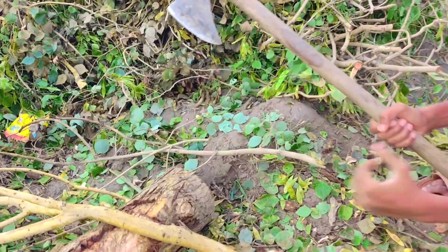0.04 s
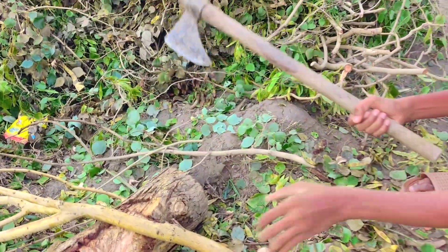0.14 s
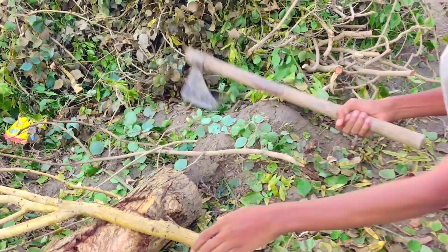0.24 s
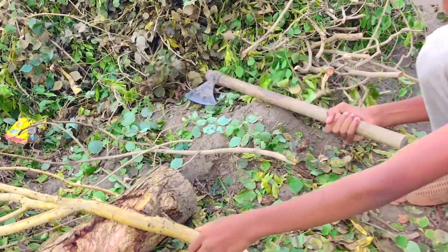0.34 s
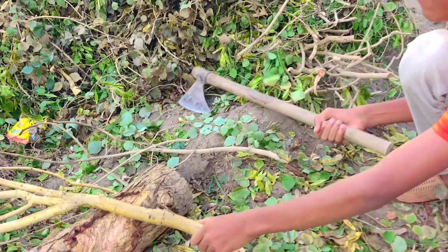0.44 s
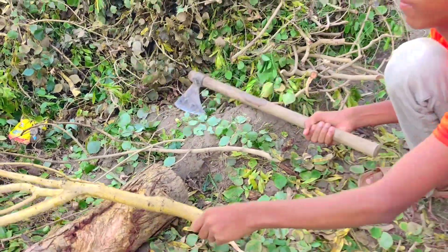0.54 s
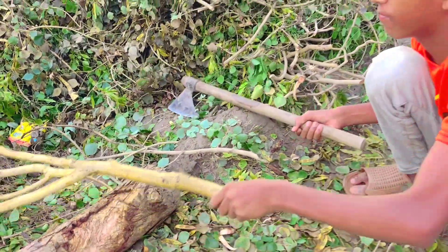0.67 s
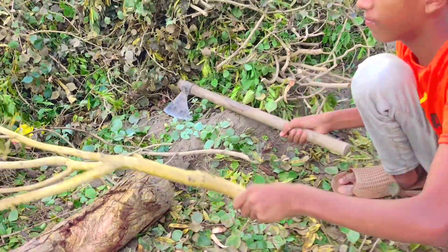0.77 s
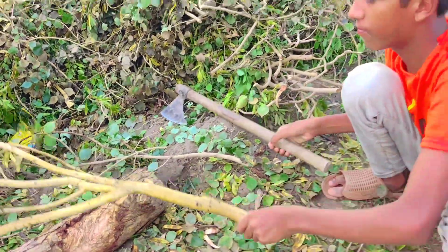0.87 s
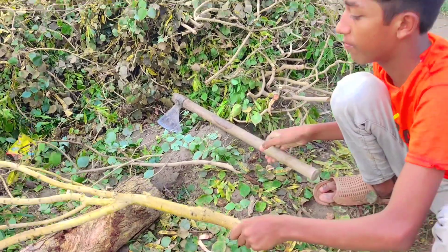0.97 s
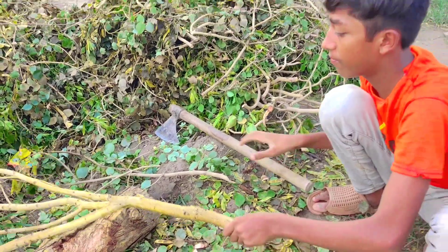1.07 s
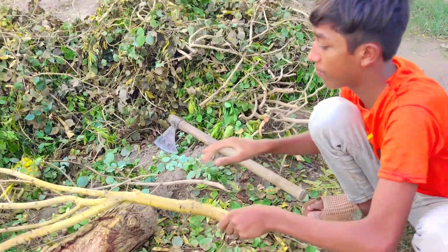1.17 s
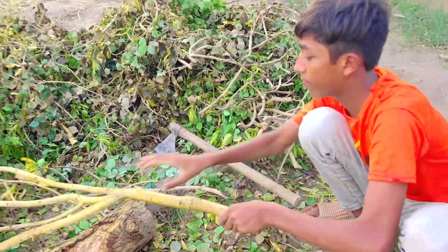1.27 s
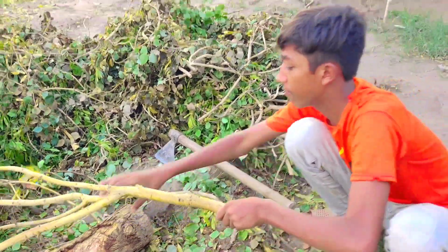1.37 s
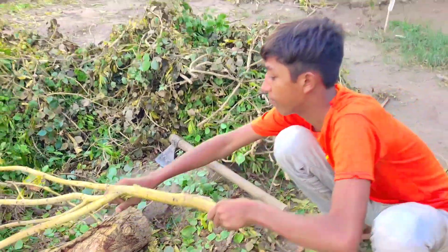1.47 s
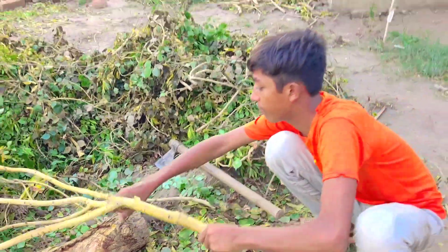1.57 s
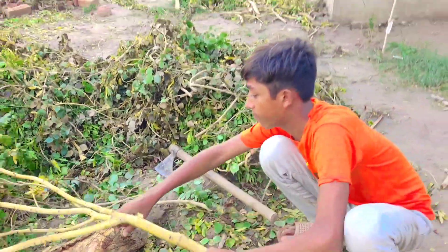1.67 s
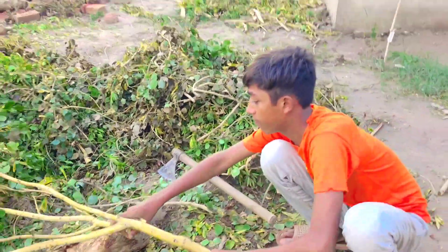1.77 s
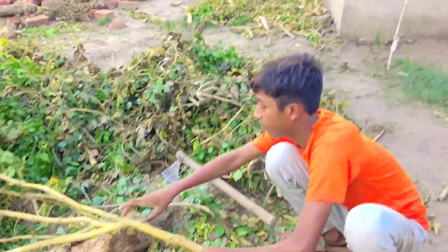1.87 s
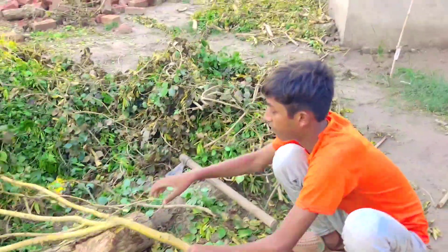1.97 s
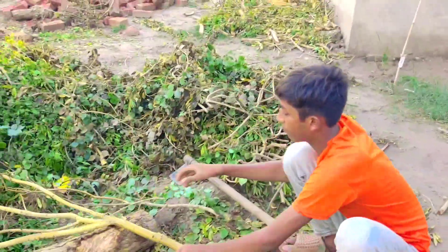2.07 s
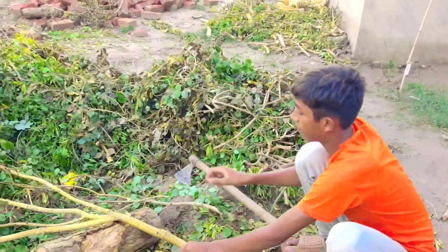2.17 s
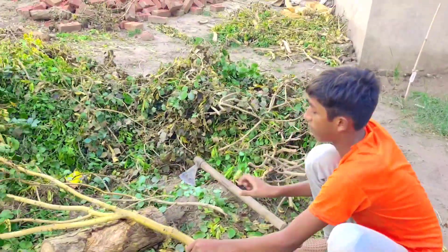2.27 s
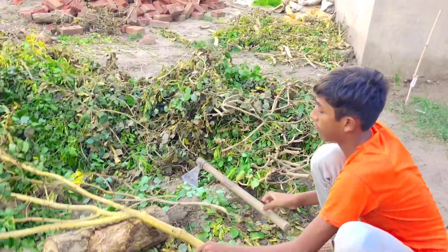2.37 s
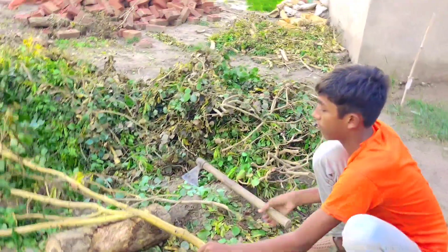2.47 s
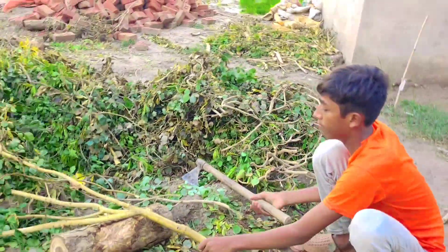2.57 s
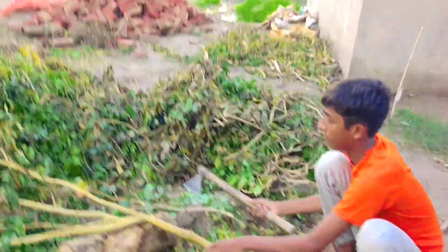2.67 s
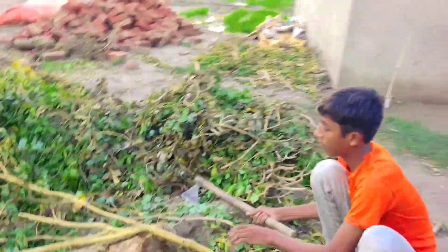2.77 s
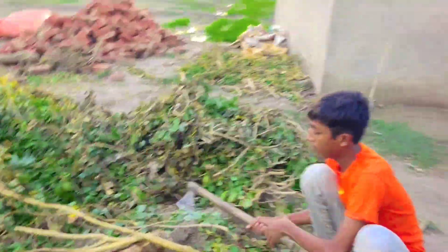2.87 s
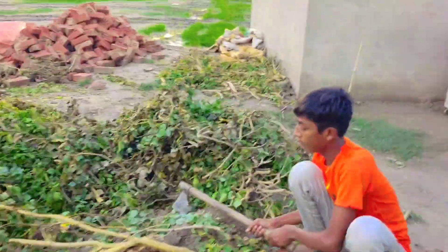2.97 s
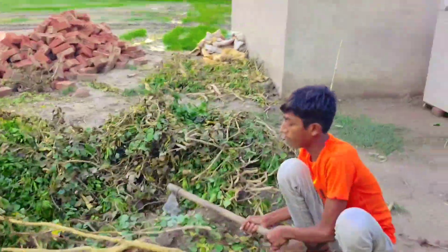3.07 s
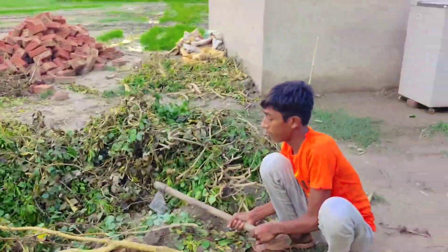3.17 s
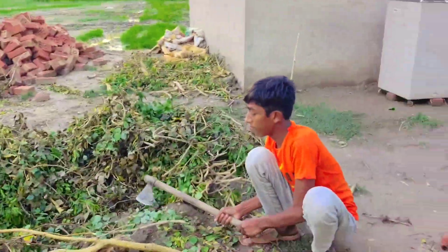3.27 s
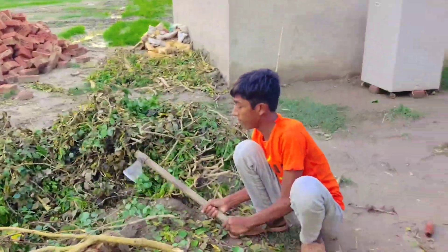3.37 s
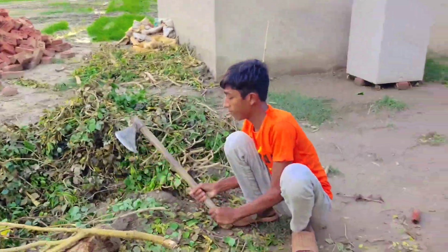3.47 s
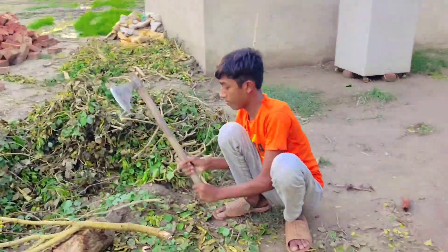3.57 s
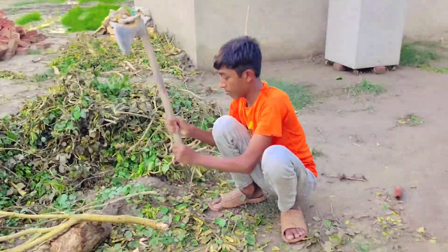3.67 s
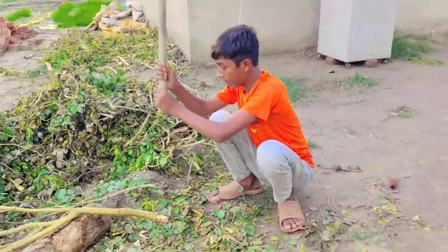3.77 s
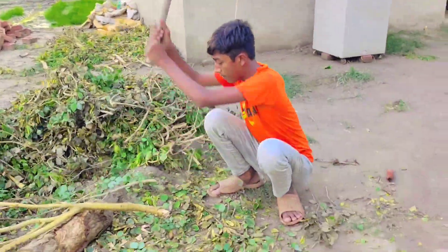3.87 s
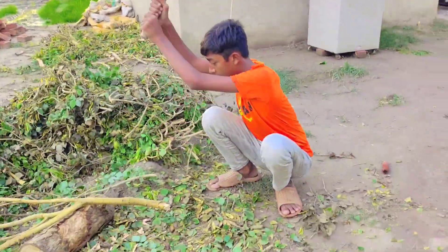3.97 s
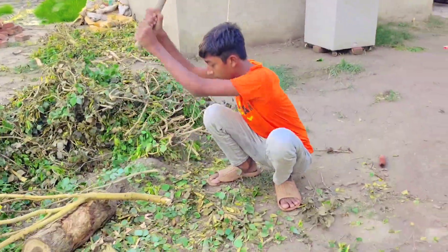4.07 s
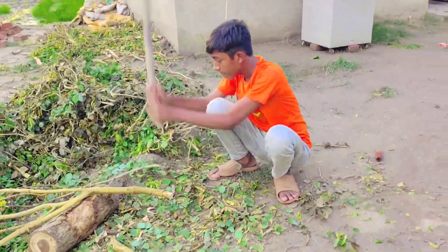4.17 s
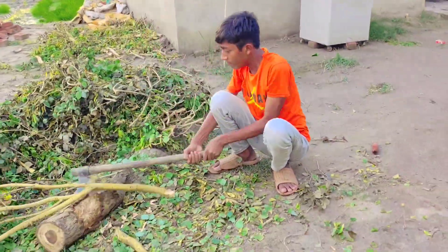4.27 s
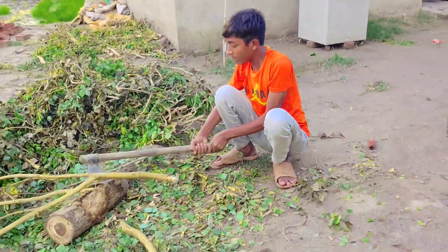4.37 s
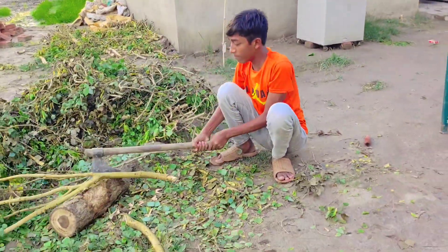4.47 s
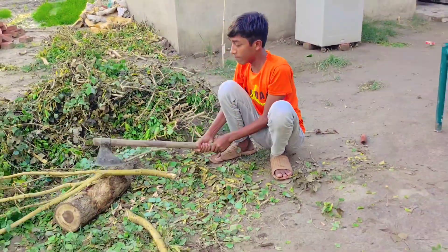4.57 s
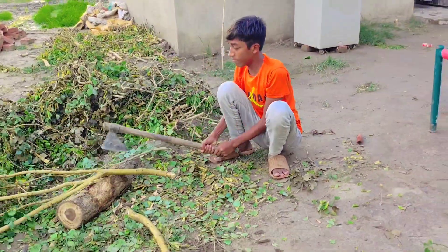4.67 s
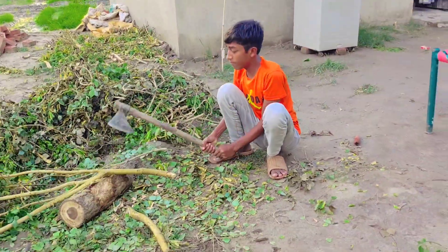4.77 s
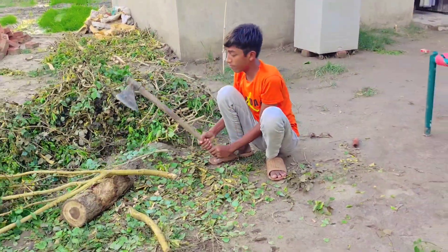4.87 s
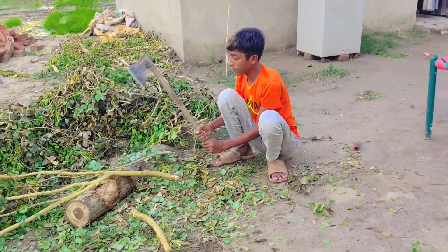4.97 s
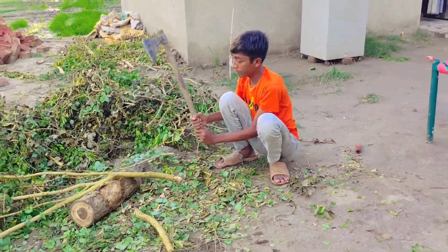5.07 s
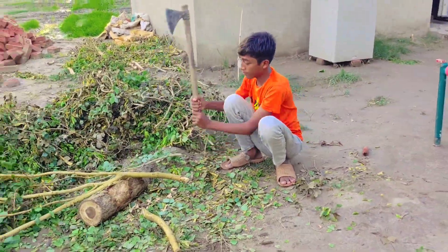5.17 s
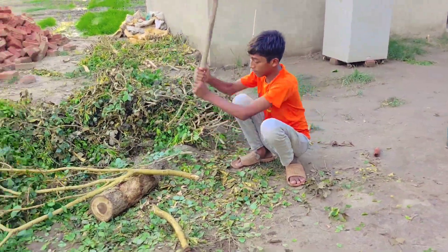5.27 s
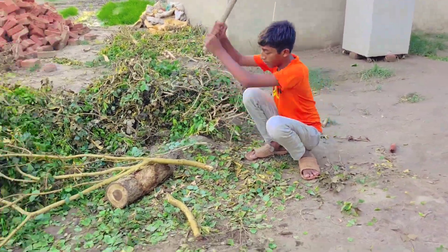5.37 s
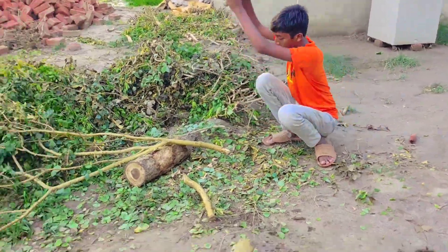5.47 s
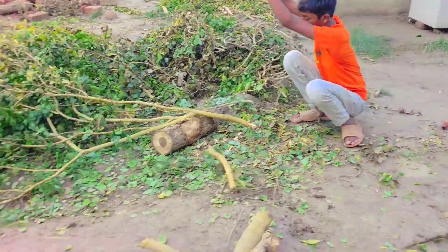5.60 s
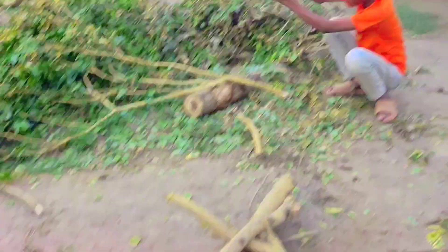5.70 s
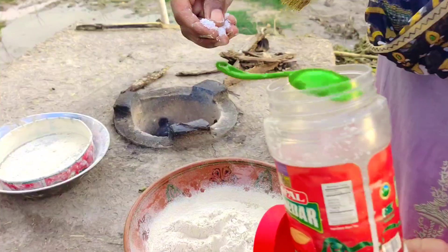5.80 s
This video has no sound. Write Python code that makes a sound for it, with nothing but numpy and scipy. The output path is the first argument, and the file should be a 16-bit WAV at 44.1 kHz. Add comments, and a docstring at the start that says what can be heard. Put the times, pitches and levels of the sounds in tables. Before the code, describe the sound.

Close outdoor stereo pickup in an open yard: a hatchet scrapes through stems and stops with a click, then a leafy branch rustles and drags with light woody knocks and dull bumps. A small bird whistles and chirrups during a calmer pause. One very loud, dry chop cracks the wood, leaves shiver briefly, and the bird continues over faint distant engines.

```python
"""Hatchet blow in a village yard

A hatchet scrapes to a stop, a leafy branch is dragged onto a log, and one hard blow chops into it.
Crackling noise makes the tearing fibres and leaves; decaying sines and narrow noise make the wood knocks.
A small bird sings in gliding tones nearby, two engines drone far off as wavering sines, and air rumbles."""
import sys
import numpy as np
from scipy import signal
from scipy.fft import rfft, irfft
from scipy.io import wavfile
from scipy.ndimage import uniform_filter1d, map_coordinates

SR = 44100
rng = np.random.default_rng(int(sys.argv[2]) if len(sys.argv) > 2 else 0)


def wrap_up_sound(samples):
    """Save the sound to the file named by the first command line argument, as 16-bit audio."""
    columns = np.atleast_2d(samples).T
    # keep every value between -1 and 1, then stretch to whole-number steps
    tamed = np.clip(columns, -1, 1)
    steps = np.round(tamed * 32767).astype(np.int16)
    wavfile.write(sys.argv[1], SR, steps)


N = 257544
T = np.arange(N) / SR
HZ = np.fft.rfftfreq(N, 1 / SR)


def amp(db):
    """Decibels to gain."""
    return 10 ** (np.asarray(db) / 20)


def evened(x):
    """Scales to rms 1."""
    return x / np.sqrt(np.mean(x ** 2) + 1e-20)


def read(points, hz):
    """Reads a table on a log-frequency axis."""
    f, value = np.transpose(points)
    return np.interp(np.log(hz + 1), np.log(f + 1), value)


def sides(db):
    """Left and right gains for a level difference; positive leans left."""
    return amp(np.array([[.5], [-.5]]) * db)


def add(mix, s, sound):
    """Mixes a stereo sound in at time s."""
    part = mix[:, max(round(s * SR), 0):][:, :sound.shape[-1]]
    part += sound[:, :part.shape[1]]


def peak(hz, centre_hz, half_width_hz):
    """Gain of one resonance, halved at half_width_hz from its centre."""
    return 1 / (1 + ((hz - centre_hz) / half_width_hz) ** 2)


def burst(t, rise, decay):
    """Envelope that swells quickly and dies away."""
    return (1 - np.exp(-t / rise)) * np.exp(-t / decay)


# likeness of left and right for sound from all round: (frequency [Hz], coherence [-1 to 1])
ALL_ROUND_LIKENESS = [(30, 0.55), (65, 0.89), (130, 0.99), (300, 0.83), (640, 0.73), (1400, -0.15),
                      (3000, -0.048), (7000, -0.14), (15000, 0.56)]


def noise(gain, size=N, grain_db=0, likeness=ALL_ROUND_LIKENESS):
    """Stereo noise of a given spectrum at rms 1; grain_db roughens it with random spikes."""
    grain = amp(grain_db * np.minimum(rng.exponential(1, size), 6))
    white = rng.standard_normal((2, size)) * grain
    a, b = rfft(white)
    same = np.clip(read(likeness, np.fft.rfftfreq(size, 1 / SR)), -1, 1)
    pair = np.array([a, same * a + np.sqrt(1 - same ** 2) * b])
    return evened(irfft(pair * gain, size))


def wander(rate_hz):
    """Slow random drift of rms 1, with little movement faster than rate_hz."""
    size, step_s = 16384, 16 / SR
    lowpass = np.exp(-(np.fft.rfftfreq(size, step_s) / rate_hz) ** 2)
    slow = irfft(rfft(rng.standard_normal(size)) * lowpass)
    return evened(np.interp(T, np.arange(size) * step_s, slow))


SWELL_ROUND = 0.34  # how blunt the top of a swell is


def swells(rows):
    """Gain over time of movements that each rise to a blunt top and settle; their powers add."""
    power = np.zeros(N)
    for s, db, rise, fall in rows:
        away = np.where(T < s, (s - T) / rise, (T - s) / fall)
        drop = np.minimum(np.hypot(away, SWELL_ROUND) - SWELL_ROUND, 20)
        power += amp(2 * db) * np.exp(-2 * drop)
    return np.sqrt(power)


def crackle(count, low_hz, high_hz, decay_s, spread_db):
    """Tiny snaps scattered at random, each with its own pitch, force and side; rms 1."""
    when, pitch, force, side = rng.random((count, 4)).T
    steps = np.arange(300)
    t, hz = steps / SR, low_hz * (high_hz / low_hz) ** pitch[:, None]
    snaps = np.sin(2 * np.pi * hz * t) * burst(t, .0001, decay_s)
    force_db = spread_db * np.minimum(-np.log(1 - force), 4)
    gains = amp(force_db) * sides(24 * (side - .5))
    at = (when * (N - len(steps))).astype(int)[:, None] + steps
    channels = [np.bincount(at.ravel(), (snaps * gain[:, None]).ravel(), N) for gain in gains]
    return evened(np.array(channels))


# colour of the tearing fibres: (frequency [Hz], relative level [dB per Hz])
TEAR_COLOUR = [(100, -7.5), (280, -2.5), (410, -17), (600, 1), (900, -9), (1250, -3.5), (1490, -11.5),
               (2100, -2), (2950, 0.5), (3700, -6.5), (5500, -10.5), (7700, -10.5), (8600, -15.5),
               (10500, -10.5), (13000, -13), (15500, -15)]
# narrow resonances of blade and haft, and one hollow: (frequency [Hz], width [Hz], boost [dB])
HATCHET_MODES = [(1610, 130, 1.5), (1823, 85, 3), (2050, 60, 5.5), (2270, 65, 5), (2450, 60, -11.5),
                 (2570, 80, 4), (2862, 80, 2.5), (2980, 50, 3), (3370, 120, 9.5), (3960, 49, 6),
                 (4256, 68, 5.5), (4820, 60, 2.5), (5430, 110, 6.5), (5610, 50, 3.5), (6800, 180, 2)]
# modes of branch and log, before the bass cut: (frequency [Hz], level [dB], t60 [s])
LOG_MODES = [(68, -19, 0.098), (120, -12, 0.06), (260, -12, 0.076), (291.7, -21, 0.063), (505, -32, 0.03),
             (601, -12, 0.034), (687, -26.5, .035), (1100, -25.5, 0.04), (1216, -8, 0.04), (1170, -30, .06),
             (1370, -27, 0.03)]
# the branch is grazed, driven onto the log, and its ring returns softly from the wall:
# (time [s], level [dB], contact time [s])
LOG_CONTACTS = [(4.4129, -16.5, .0007), (4.4154, -20, .0008), (4.4291, -11, 0.00077),
                (4.4346, 1.5, 0.00036), (4.4432, -17, 0.0024), (4.4493, -6, 0.0056), (4.4734, -25.5, .0004)]
# direction of the blow: (frequency [Hz], left-right difference [dB])
BLOW_LEAN = [(60, 2.5), (110, 2.5), (200, 2.5), (380, 1), (700, 2.5), (1290, 5.5), (2380, -2.5), (4400, -2),
             (8120, 5), (15000, -1)]
# likeness of left and right for the blow, which comes from one spot: (frequency [Hz], coherence)
BLOW_LIKENESS = [(100, 0.93), (700, 0.92), (3200, 0.6), (4500, 0.28), (15000, .18)]


def chop():
    """Fibres tear in a dense crackle, coloured by the hatchet; branch and log ring with it."""
    hatchet_db = sum(db * peak(HZ, hz, width / 2) for hz, width, db in HATCHET_MODES)
    colour = amp(read(TEAR_COLOUR, HZ) + hatchet_db)
    tear = noise(colour, grain_db=3.5, likeness=BLOW_LIKENESS) * bite()
    t = np.arange(SR // 2) / SR
    ring = sum(amp(db - 60 * t / t60) * np.sin(2 * np.pi * hz * t) for hz, db, t60 in LOG_MODES)
    ring = signal.lfilter(*signal.butter(3, 50, "high", fs=SR), ring)  # cuts the deep bass below 50 Hz from the ring
    wood = np.zeros((2, N))
    for s, db, contact in LOG_CONTACTS:
        push = np.exp(-((t[:600] - contact / 2) / (contact / 2)) ** 2)  # a longer contact is duller
        add(wood, s, amp(db) * np.convolve(ring, push / push.sum()) * sides(0))
    blow = tear + wood + splinters()
    left, right = irfft(rfft(blow) * sides(read(BLOW_LEAN, HZ)), N)
    return np.array([left, np.roll(right, 7)])  # the right microphone hears it 7 samples later


# what dies away after the crack (split, tearing fibres, scattering chips): (level [dB], decay [s])
CRACK_STAGES = [(2.5, 0.0031), (-16.5, 0.018), (-41.5, 0.04)]
CHOP_S, BRUSH_S, BRUSH_DB = 4.4286, 0.022, -21  # the blade brushes the bark, then the wood cracks
CRACK_RISE_S = 0.0025


def bite():
    """Force of the blade: a growing brush through the bark, then a sudden crack that dies in stages."""
    after = np.maximum(T - CHOP_S, 0)
    growth = np.clip(1 + (T - CHOP_S) / BRUSH_S, 0, 1)
    brush = amp(BRUSH_DB) * growth * np.exp(-after / CRACK_RISE_S)
    return brush + sum(amp(db) * burst(after, CRACK_RISE_S, decay) for db, decay in CRACK_STAGES)


# splinters that break away as the blade sinks in: (time [s], level [dB], frequency [Hz], decay [s])
SPLINTER_HITS = [(4.4355, -21, 7900, 0.0034), (4.4383, -20, 1800, .003), (4.4477, -21, 2550, .004),
                 (4.4493, -26, 2830, 0.0093), (4.4545, -26, 2050, .003), (4.46, -24, 1750, 0.0012)]
SPLINTER_HALF_WIDTH_HZ = 150
# the bright snap at the height of the crack
SNAP_S, SNAP_DB, SNAP_DECAY_S, SNAP_HZ = 4.4312, -10.5, 0.0016, 11000


def splinters():
    """One bright snap as the branch gives way, and splinters, each a noise burst with its own pitch."""
    out, size = np.zeros((2, N)), 4096
    t, hz = np.arange(size) / SR, np.fft.rfftfreq(size, 1 / SR)
    snap = noise(peak(hz, SNAP_HZ, 6000), size, likeness=BLOW_LIKENESS)
    add(out, SNAP_S, amp(SNAP_DB) * snap * burst(t, .0004, SNAP_DECAY_S))
    for s, db, ring_hz, decay in SPLINTER_HITS:
        crack = noise(peak(hz, ring_hz, SPLINTER_HALF_WIDTH_HZ), size, likeness=BLOW_LIKENESS)
        add(out, s, amp(db) * crack * burst(t, .0004, decay))
    return out


# resonances of the sliding blade: (frequency [Hz], width [Hz], relative level [dB])
BLADE_MODES = [(1090, 260, -9.5), (1820, 110, -4), (2660, 160, -3), (3150, 440, -1), (3870, 140, 1.5),
               (5630, 370, -1), (6360, 380, -2), (7900, 1400, -21), (9150, 270, -9), (12000, 3500, -11)]
# bright colour shared by click, knocks and rustle, with the microphone's own resonances:
# (frequency [Hz], relative level [dB per Hz])
BRIGHT_COLOUR = [(410, -46), (700, -14.5), (968, -16), (1150, -14.5), (1250, -25), (3030, -1.5), (3730, -8),
                 (4080, -4.5), (4580, -7.5), (5940, -1.5), (7000, -7.5), (7650, -4), (8800, -12.5),
                 (11600, -6), (13600, -10), (14800, -6), (15500, -13)]
# the blade brushes through stems, grips the soil, and stops with a click
GRIP_S, STOP_S, SLIDE_DB, CLICK_DB, CLICK_DECAY_S = 0.39, 0.4163, -36, -12.5, 0.0015
STEMS_DB, APPROACH_DB_PER_S, RELEASE_DB_PER_S = -9, 199, 260
SLIDE_SAG_PER_S, SLIP_DB, SLIPS_HZ = .5, 1.5, 140


def slide():
    """The blade nears through stems, scrapes in jerks that sink in pitch as it slows, and clicks to a stop."""
    before, after = np.maximum(GRIP_S - T, 0), np.maximum(T - STOP_S, 0)
    db = SLIDE_DB + STEMS_DB * (before > 0) - APPROACH_DB_PER_S * before - RELEASE_DB_PER_S * after
    modes = sum(amp(mode_db) * peak(HZ, hz, width / 2) for hz, width, mode_db in BLADE_MODES)
    scrape = noise(modes, grain_db=1.5)
    speed = 1 - SLIDE_SAG_PER_S * np.clip(T - GRIP_S, -.1, .1)
    # reading the noise at the blade's speed bends its pitch
    scrape = np.array([map_coordinates(side, [np.cumsum(speed)], order=3) for side in scrape])
    jerks = amp(db + SLIP_DB * wander(SLIPS_HZ)) * scrape
    click = noise(amp(read(BRIGHT_COLOUR, HZ))) * burst(after, 0.0011, CLICK_DECAY_S)
    return jerks + amp(CLICK_DB) * click * sides(2.7)


# light knocks of wood, and near 2.98 s clean overtones of a rubbing squeak, before a common gain: # (time [s],
# ring level [dB], ring frequency [Hz], cleanness [0-1], crunch level [dB], decay [s], # left-right difference
# [dB])
WOOD_KNOCKS = [(0.228, -64, 750, .3, -52.5, .004, -2), (0.369, -48, 2390, .5, -45, 0.0065, 0),
               (0.391, -43, 2700, 0.8, -44, 0.007, 2), (0.411, -43, 1824, 0.94, -43, 0.013, 4),
               (0.4148, -29, 3190, 1, -37, 0.0045, 3), (0.416, -43, 1058, 0.63, -38, 0.012, 1),
               (0.425, -36, 5640, .6, -28.5, 0.0034, 2), (0.437, -40, 2650, .3, -50, 0.0095, 1),
               (0.452, -41, 1560, 0.6, -44, 0.0071, 8), (0.451, -39.5, 2800, 0.2, -46, 0.012, -3),
               (0.481, -39.5, 660, 0.6, -46, 0.0098, -1), (1.696, -43.5, 1610, .1, -50, 0.003, 2),
               (1.697, -48, 1150, .1, -60, 0.003, 2), (1.731, -52, 6300, .4, -43.5, 0.0036, -1),
               (1.917, -53, 750, 0.1, -53, 0.007, 1), (1.991, -48.5, 2660, 0.47, -56, 0.0062, -5),
               (2.032, -51, 2830, 0.7, -57, .008, 0), (2.128, -49, 3040, .5, -48, .005, -3),
               (2.178, -47, 2840, .6, -54, .004, -2), (2.246, -49, 1364, 0.57, -47, 0.005, -1),
               (2.262, -48, 2900, .4, -52, .006, 0), (2.331, -50, 2200, .4, -52, .003, -2),
               (2.352, -49, 3020, 0.42, -45, 0.0041, -4), (2.384, -44.5, 3650, 0.2, -47.5, 0.033, -3),
               (2.403, -41.5, 3010, 0.5, -35.5, 0.016, -4.5), (2.421, -42, 2490, 0.6, -55, 0.0071, -1),
               (2.482, -53, 724, 0.69, -48, 0.0056, -4), (2.536, -55, 1546, 0.62, -62, 0.012, 0),
               (2.626, -50.5, 4760, .8, -62, .014, -5), (2.649, -47, 2610, 0.6, -58, .006, -9),
               (2.755, -49, 704, 0.3, -54, 0.0042, -2), (2.847, -46.5, 2310, 0.84, -60, 0.011, 1),
               (2.885, -54, 2810, 0.76, -61, .015, -8), (2.912, -54, 3450, .7, -60, .01, -8),
               (2.929, -51.5, 1480, 0.27, -59, .007, 0), (2.947, -58, 3900, .5, -62, .009, -3),
               (2.978, -43, 3070, 0.9, -54, 0.013, -8), (2.984, -40, 1846, 0.2, -46, 0.012, -1),
               (2.987, -43.5, 3940, 0.9, -57, 0.01, -6), (2.988, -44.5, 4720, 0.7, -58, 0.0085, -8),
               (2.987, -37.5, 950, 0.1, -58, 0.0082, 6), (3.043, -53, 1440, .6, -58, .004, 0),
               (3.671, -49, 2298, .1, -67, 0.024, 1), (4.197, -52, 1980, .1, -59, 0.003, 3)]
KNOCK_LAG_S = .00008  # the clean tone reaches the right microphone this much later


def knocks():
    """Sticks knock: a crunch of bark and one ring, anything from a dry clack to a clean note."""
    out, size = np.zeros((2, N)), 8192
    t, hz = np.arange(size) / SR, np.fft.rfftfreq(size, 1 / SR)
    crunch = amp(read(BRIGHT_COLOUR, hz))
    for s, ring_db, ring_hz, clean, crunch_db, decay, pan_db in WOOD_KNOCKS:
        tone = np.sqrt(2) * np.sin(2 * np.pi * ring_hz * (t - np.array([[0], [KNOCK_LAG_S]])))
        clack = noise(peak(hz, ring_hz, 130 + 0.14 * ring_hz), size)
        ring = clean * tone + np.sqrt(1 - clean ** 2) * clack
        sound = amp(ring_db) * ring + amp(crunch_db) * noise(crunch, size, grain_db=1.5)
        add(out, s - .001, 1.58 * sound * burst(t, 0.0015, decay) * sides(pan_db))
    return out


# stems and wood squeaking briefly as they rub: (time [s], length [s], level [dB],
# start frequency [Hz], end frequency [Hz], overtones [dB])
RUB_SQUEAKS = [(0.307, 0.03, -62.5, 3120, 2950, -20), (0.322, 0.034, -59, 3870, 3690, -30),
               (0.34, 0.026, -60, 2770, 2800, 10), (0.348, 0.027, -54, 3100, 3180, -5),
               (0.363, 0.026, -44, 3530, 3520, -30), (0.37, 0.026, -43.5, 3120, 3140, 21),
               (2.968, 0.013, -48, 1150, 1070, -12), (2.979, 0.016, -38.5, 1058, 987, -14)]


def squeaks():
    """Stick and slip: a short, unsteady tone with two overtones."""
    out = np.zeros((2, N))
    for s, length, db, start_hz, end_hz, overtones_db in RUB_SQUEAKS:
        size = int(length * SR)
        jitter = evened(uniform_filter1d(rng.standard_normal(SR // 4), 40))[:size]
        hz = np.linspace(start_hz, end_hz, size) * (1 + 0.0079 * jitter)
        phase = 2 * np.pi * np.cumsum(hz) / SR
        overtones = np.sin(2 * phase) + 0.37 * np.sin(3 * phase)
        tone = np.sin(phase) + amp(overtones_db) * overtones
        add(out, s, amp(db) * evened(tone * signal.windows.tukey(size, .6)) * sides(0))
    return out


# movements that stir the leaves: (time of height [s], level [dB], rise [s], fall [s])
LEAF_STIRS = [(0.09, -67.5, 0.14, 0.21), (0.44, -47.5, .02, 0.058), (0.617, -55.5, 0.028, 0.029),
              (0.865, -39.5, 0.078, 0.21), (1.189, -48, 0.023, 0.028), (1.35, -57.5, 0.03, 0.13),
              (1.735, -53.5, 0.045, 0.17), (1.92, -52.5, 0.029, 0.012), (2.11, -47, 0.097, 0.2),
              (2.24, -49, 0.029, 0.044), (2.51, -53.5, 0.038, 0.087), (2.645, -54, 0.055, 0.086),
              (2.93, -61, 0.14, 0.38), (3.545, -63.5, 0.057, 0.039), (3.7, -63, 0.048, 0.025),
              (3.96, -67, 0.13, 0.13), (4.38, -67.5, 0.14, 0.055), (4.48, -40.5, 0.0089, 0.061),
              (4.63, -53.5, 0.043, 0.082), (5.1, -70.5, .015, 0.042), (5.385, -58.5, .02, 0.019),
              (5.52, -74, .03, .05)]
STIR_REST_DB = -92  # leaves at rest


def stirring():
    """How strongly the branch moves: swells over a faint rest level."""
    return swells(LEAF_STIRS) + amp(STIR_REST_DB)


def rustle(stir):
    """Countless leaf contacts as the branch moves, with coarser snaps of stalks among them."""
    wash = noise(amp(read(BRIGHT_COLOUR, HZ)), grain_db=1.7) * amp(wander(43))
    stalks = crackle(count=7000, low_hz=2500, high_hz=7800, decay_s=.0015, spread_db=2.0)
    return (amp(1.9) * wash + amp(-6.5) * stalks) * stir * sides(-1.3)


def twigs(stir):
    """Small twigs snap at random, louder while the branch moves; each has its own pitch and side."""
    out, t = np.zeros((2, N)), np.arange(900) / SR
    for when, pitch, force, side in rng.random((150, 4)):
        at = int(when * N)
        tick = np.sin(2 * np.pi * 1900 * 5 ** pitch * t) * burst(t, .0002, 0.001)
        add(out, T[at], stir[at] * amp(-5.5 + 13 * force ** 2) * tick * sides(12 * (side - .5)))
    return out


# ticks of dry leaves and grit: (time [s], level [dB], left-right difference [dB])
LEAF_TICKS = [(0.018, -37, -3.5), (0.086, -52.5, -6), (1.413, -52, -2.5), (2.351, -40.5, -6),
              (2.994, -46, -9), (3.035, -45, -7), (3.066, -47, -7), (3.101, -50, 2), (3.341, -48, -9)]
# brief ringing of the ticks: (frequency [Hz], width [Hz], relative level [dB])
TICK_MODES = [(7400, 7500, -21.5), (8630, 460, -15.5), (12640, 410, 1.5), (14000, 540, -1)]
TICK_DECAY_S = 0.012


def ticks():
    """Dry leaves and grit tick: short noise bursts through high resonances."""
    out, size = np.zeros((2, N)), 16384
    t, hz = np.arange(size) / SR, np.fft.rfftfreq(size, 1 / SR)
    modes = sum(amp(mode_db) * peak(hz, mode_hz, width / 2) for mode_hz, width, mode_db in TICK_MODES)
    for s, db, pan_db in LEAF_TICKS:
        add(out, s - .001, amp(db) * noise(modes, size) * burst(t, 0.0018, TICK_DECAY_S) * sides(pan_db))
    return out


# dull low bumps, before a common gain: (time [s], level [dB], frequency [Hz], left-right difference [dB])
LOW_BUMPS = [(0.403, -38.5, 122, 1), (1.991, -37.5, 133, 11.5), (2.213, -36.5, 77, 9),
             (2.394, -37, 149, -1), (2.815, -31, 62.5, -7), (2.878, -26.5, 77, -4.5),
             (2.976, -30.5, 77, -11), (3.519, -37.5, 81.5, 14.5), (3.591, -37, 131, 9.5),
             (4.60, -38.5, 66, 6.5)]
# likeness of left and right for the bumps: (frequency [Hz], coherence)
BUMP_LIKENESS = [(40, 0.12), (90, 0.16), (160, 0.92), (400, 0.86)]
BUMP_DECAY_S = 0.037


def bumps():
    """Dull low bumps, wind buffets or handling of the microphones: soft bursts of low, narrow noise."""
    out, size = np.zeros((2, N)), 16384
    t, hz = np.arange(size) / SR, np.fft.rfftfreq(size, 1 / SR)
    for s, db, bump_hz, pan_db in LOW_BUMPS:
        bump = noise(peak(hz, bump_hz, 0.34 * bump_hz), size, likeness=BUMP_LIKENESS)
        add(out, s, 1.44 * amp(db) * bump * burst(t, 0.0068, BUMP_DECAY_S) * sides(pan_db))
    return out


# feet and branch scuffing over earth: (time of height [s], level [dB], rise [s], fall [s])
EARTH_SCUFFS = [(0.416, -43.5, 0.014, 0.014), (0.92, -55.5, 0.11, 0.085), (1.75, -61.5, 0.12, 0.21),
                (2.12, -56.5, 0.066, 0.065), (2.245, -49.5, 0.043, 0.053), (2.41, -45.5, 0.023, 0.03),
                (2.55, -50.5, 0.042, 0.066), (2.93, -50.5, 0.044, 0.054), (3.05, -56, 0.027, 0.028)]
# colour of the scuffing: (frequency [Hz], relative level [dB per Hz])
EARTH_COLOUR = [(200, 4), (550, -3), (1300, -5.5), (2200, -7), (5000, -8), (15000, -38)]


def scuffing():
    """Feet and branch rub the earth: uneven dull noise with gritty snaps."""
    earth = noise(amp(read(EARTH_COLOUR, HZ)), grain_db=3.0) * amp(2.65 * wander(59))
    grit = crackle(count=3500, low_hz=2200, high_hz=4000, decay_s=.0018, spread_db=2.0)
    return (amp(-.5) * earth + amp(-6.5) * grit) * swells(EARTH_SCUFFS)


BEAT_UNEVEN = .1  # pulses come unevenly by this share


def note(length, db, pitches, swing_hz=0, rate=0, pulsing=0, swell_db=0):
    """One bird note gliding through the given pitches; in pulsed notes each pulse is a small downward sweep."""
    t = np.arange(int(length * SR)) / SR
    jitter, drift, force = (evened(uniform_filter1d(rng.standard_normal(SR // 2), size))[:len(t)]
                            for size in (40, 500, 400))
    u = t / length
    beat = 2 * np.pi * np.cumsum(rate * (1 + BEAT_UNEVEN * drift)) / SR
    glide = np.polyfit(np.linspace(0, 1, len(pitches)), pitches, len(pitches) - 1)
    hz = np.polyval(glide, u) + swing_hz * np.sin(beat) + (18 + 70 * pulsing) * jitter
    phase = 2 * np.pi * np.cumsum(hz) / SR
    pulses = 1 - pulsing * np.cos(beat)
    swell = signal.windows.tukey(len(t), .35) * pulses * amp(swell_db * u + 2 * pulsing * force)
    return amp(db) * evened(swell * (np.sin(phase) + amp(-32) * np.sin(2 * phase)))


# arched whistles, each ending in a quick downward flick: (time [s], length [s], level [dB],
# top frequency [Hz], flick relative to whistle [dB], left-right difference [dB])
BIRD_WHISTLES = [(3.16, 0.061, -52.5, 3500, -20, -9), (3.788, 0.062, -56, 3530, -3.5, 7),
                 (4.631, 0.066, -51.5, 3490, -4, -4), (5.079, 0.07, -47.5, 3522, -7, -4.5)]
# pitch from start to end, as shares of the top
WHISTLE_SHAPE, FLICK_SHAPE = np.array((0.97, 0.98, 0.99, 1.0, 0.98)), np.array((0.96, 0.95, 0.935))
FLICK_S, FLICK_GAP_S, WHISTLE_SWELL_DB = .014, .004, 2.5  # each whistle grows from start to end
# chirrups, a pip and a fast buzz: (time [s], pip level [dB], frequency [Hz], left-right difference [dB])
BIRD_CHIRRUPS = [(3.436, -48, 3717, 6), (4.264, -51.5, 3536, -3)]
PIP_S, PIP_SHAPE, NOTE_GAP_S = 0.022, np.array((1, 0.98, 0.99, 0.97, 0.93)), 0.003
BUZZ_SHAPE = np.array((.86, 1, .97))  # the buzz arches
BUZZ_S, BUZZ_DB, BUZZ_SWING_HZ, BUZZ_PER_S = 0.028, -4, 330, 170  # level is relative to the pip
# long calls, a pip and a low raspy trill: (time [s], pip level [dB], pip frequency [Hz], trill length [s],
# trill level [dB], start frequency [Hz], end frequency [Hz], left-right difference [dB])
BIRD_TRILLS = [(3.594, -50, 3830, 0.1, -51.5, 2760, 2680, 4),
               (4.022, -53.5, 3700, 0.125, -56, 2677, 2780, 4.5),
               (4.868, -54.5, 3557, 0.098, -57, 2690, 2607, 7)]
TRILL_SWING_HZ, TRILL_PER_S, TRILL_PULSING = 60, 62, 0.4
# chips, quick downward sweeps: (time [s], level [dB], left-right difference [dB])
BIRD_CHIPS = [(3.162, -59.5, -2), (3.419, -67, 0), (3.48, -60, 0), (3.615, -65, -9), (4.038, -68.5, 7),
              (4.245, -64.5, -0.5)]
CHIP_S, CHIP_HZ = 0.0122, (3670, 2760, 2343)
THIN_START_S, THIN_LENGTH_S, THIN_SWING_HZ, THIN_PER_S = 0.025, .22, 453, 110
THIN_DB, THIN_HZ = -70, (7500, 7000)  # the thin trill sinks a little in pitch


def bird():
    """A small bird takes turns between three calls of two notes each, with chips; a thin trill comes first."""
    out, second_s = np.zeros((2, N)), PIP_S + NOTE_GAP_S
    for s, length, db, hz, flick_db, pan_db in BIRD_WHISTLES:
        whistle = note(length, db, hz * WHISTLE_SHAPE, swell_db=WHISTLE_SWELL_DB)
        flick = note(FLICK_S, db + flick_db, hz * FLICK_SHAPE)
        add(out, s, whistle * sides(pan_db))
        add(out, s + length + FLICK_GAP_S, flick * sides(pan_db))
    for s, db, hz, pan_db in BIRD_CHIRRUPS:
        pip = note(PIP_S, db, hz * PIP_SHAPE)
        buzz = note(BUZZ_S, db + BUZZ_DB, hz * BUZZ_SHAPE, BUZZ_SWING_HZ, BUZZ_PER_S, pulsing=.25)
        add(out, s, pip * sides(pan_db))
        add(out, s + second_s, buzz * sides(pan_db))
    for s, pip_db, pip_hz, length, db, start_hz, end_hz, pan_db in BIRD_TRILLS:
        pip = note(PIP_S, pip_db, pip_hz * PIP_SHAPE)
        trill = note(length, db, (start_hz, end_hz), TRILL_SWING_HZ, TRILL_PER_S, TRILL_PULSING, swell_db=5)
        add(out, s, pip * sides(pan_db))
        add(out, s + second_s, trill * sides(pan_db))
    for s, db, pan_db in BIRD_CHIPS:
        add(out, s, note(CHIP_S, db, CHIP_HZ) * sides(pan_db))
    thin = note(THIN_LENGTH_S, THIN_DB, THIN_HZ, THIN_SWING_HZ, THIN_PER_S, pulsing=0.8)
    add(out, THIN_START_S, thin * sides(0))
    return out


# a distant engine: (time [s], firing rate [Hz], relative level [dB], brightness [dB per order])
ENGINE_COURSE = [(0, 63.2, -45.5, -1.5), (0.6, 65, -48.5, -1.5), (0.9, 64.5, -50.5, -0.5),
                 (1.3, 63.5, -53.5, 2.5), (1.8, 61.7, -57.5, -1), (2.2, 70, -52.5, 0.5),
                 (2.6, 70, -51, 0.5), (3.4, 71, -55, 0), (4.0, 72, -51.5, -0.5), (4.6, 70.6, -51.5, -1.5),
                 (5.05, 71.3, -51.5, -.5), (5.77, 72.3, -51.5, -1)]
# its orders: (multiple of the firing rate, relative level [dB])
ENGINE_ORDERS = [(1, -11), (2, -13), (3, -1), (4, -3.5), (5, -5), (6, -15.5), (7, -16), (8, -13)]


def engine():
    """Only the low, wavering orders of the exhaust carry this far."""
    s, *columns = np.transpose(ENGINE_COURSE)
    hz, db, tilt_db = (np.interp(T, s, column) for column in columns)
    phase = 2 * np.pi * np.cumsum(hz * (1 + .004 * wander(8.6))) / SR
    out = np.zeros(N)
    for k, order_db in ENGINE_ORDERS:
        fading_db = 2.2 * wander(4)  # moving air makes each order fade on its own
        level_db = db - 3.5 + order_db + (k - 3.5) * tilt_db + fading_db
        out += amp(level_db) * np.sin(round(k) * phase + 2 * np.pi * rng.random())
    return out * sides(1.5)


# a second engine that changes speed: (time [s], frequency [Hz], level [dB])
DRONE_COURSE = [(0, 165, -58), (0.45, 152, -48), (0.75, 136, -46.5), (1.1, 132, -53), (1.45, 141, -43.5),
                (1.8, 151, -49), (2.399, 135, -54), (3.2, 138, -49), (3.7, 126, -50.5), (4.0, 131, -46),
                (4.65, 150, -53), (5.1, 131, -61.5), (5.45, 124, -48.5), (5.77, 135, -56)]


def drone():
    """The second engine is one wavering sine whose pitch follows its speed."""
    s, hz, db = np.transpose(DRONE_COURSE)
    phase = 2 * np.pi * np.cumsum(np.interp(T, s, hz) * (1 + .01 * wander(8.2))) / SR
    return amp(np.interp(T, s, db) + 1.6 * wander(5.7)) * np.sin(phase) * sides(1.5)


# outdoor background: (frequency [Hz], relative level [dB per Hz])
AIR_COLOUR = [(15, -38), (25, -11.5), (55, 2), (122, -4), (156, -3.5), (253, -10), (399, -16.5), (567, -27),
              (648, -23.5), (871, -29), (1050, -29), (2000, -32), (2920, -29.5), (3440, -38), (7100, -47),
              (15500, -57.5)]


def air():
    """Low outdoor rumble under a faint hiss."""
    lean = sides(read([(300, 1.5), (700, 0.5), (2400, -5.0), (9000, -1.0)], HZ))
    return amp(-46.5) * noise(amp(read(AIR_COLOUR, HZ)) * lean) * amp(0.74 * wander(4.9))


def yard(x, t60, wall_s, wall_db):
    """Scatter from ground and plants, and one soft return from the house wall."""
    t = np.arange(SR * 2 // 3) / SR
    late = np.maximum(t - wall_s, 0)
    scatter = amp(-60 * t / t60) * (t > .003)
    wall = amp(wall_db) * (late > 0) * np.exp(-late / 0.0064)
    sparse = rng.standard_normal((2, len(t))) * (rng.random((2, len(t))) < .08)
    taps = sparse * (scatter + wall)
    taps /= np.linalg.norm(taps, axis=1, keepdims=True)
    return signal.fftconvolve(x.mean(0, keepdims=True), taps, axes=1)[:, :N]


def scene():
    """All sources in the open yard."""
    stir, song = stirring(), bird()
    near = chop() + slide() + knocks() + squeaks() + twigs(stir) + ticks() + bumps()
    echoes = amp(-17) * yard(near, t60=0.23, wall_s=.041, wall_db=-2.5)
    song_echoes = amp(-7.5) * yard(song, t60=.42, wall_s=0.055, wall_db=-2.5)
    background = engine() + drone() + air()
    return near + song + echoes + song_echoes + rustle(stir) + scuffing() + background


END_S, EDGE_HZ = 5.772, 15800


def record(dry):
    """Peaks near full scale are rounded off, the end closes in 2 ms, and the top band is cut."""
    held = dry / (1 + dry ** 6) ** (1 / 6)
    held = held * np.clip((END_S - T) * 500, 0, 1)
    lowpass = signal.firwin(511, EDGE_HZ, window=("kaiser", 9), fs=SR)
    return signal.oaconvolve(held, lowpass[None], "same")


dry = scene()
out = record(dry)
wrap_up_sound(out)
```